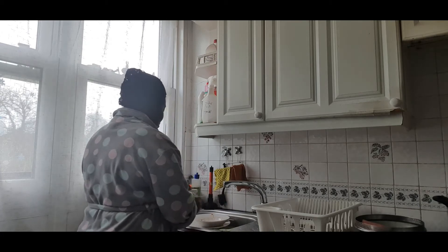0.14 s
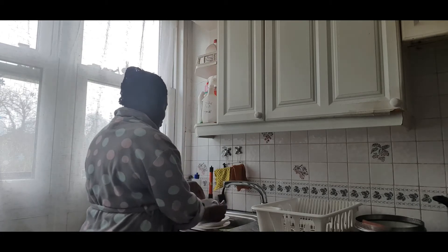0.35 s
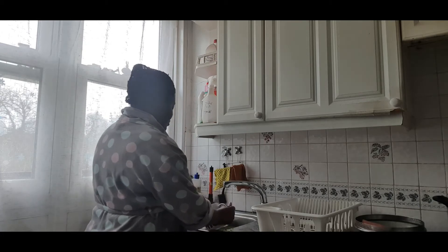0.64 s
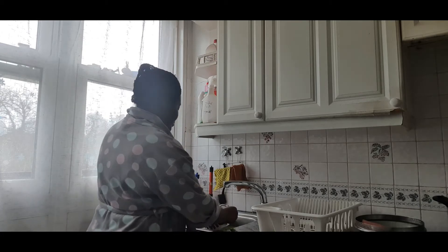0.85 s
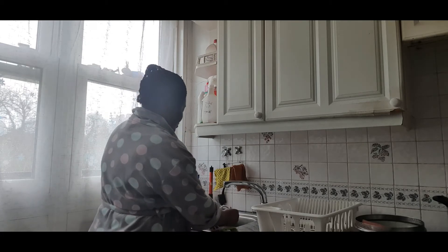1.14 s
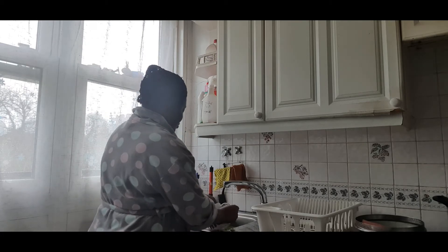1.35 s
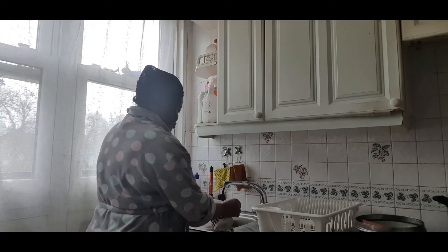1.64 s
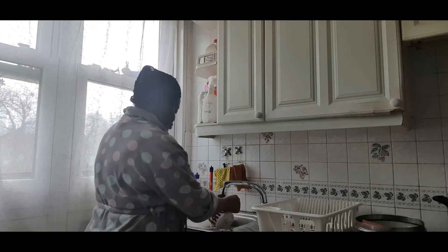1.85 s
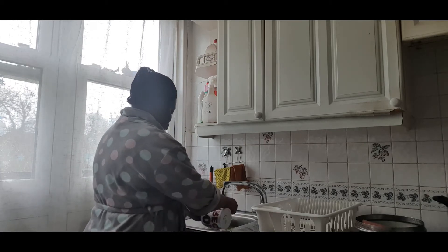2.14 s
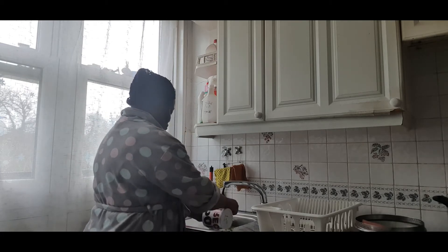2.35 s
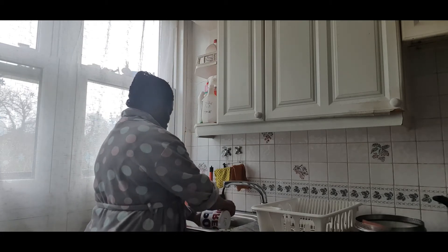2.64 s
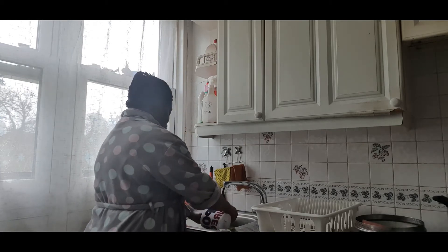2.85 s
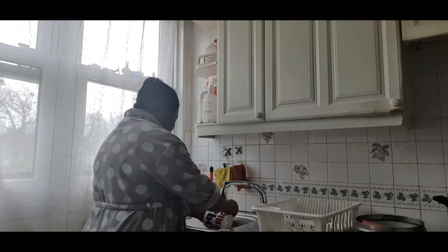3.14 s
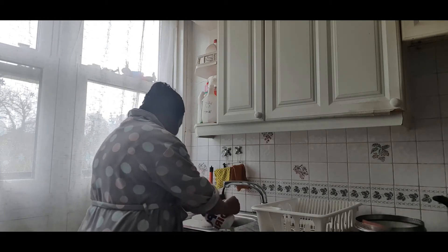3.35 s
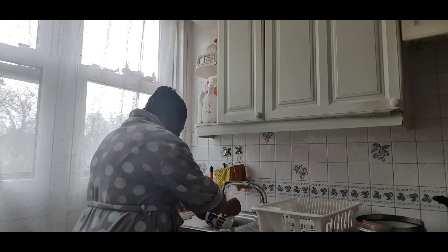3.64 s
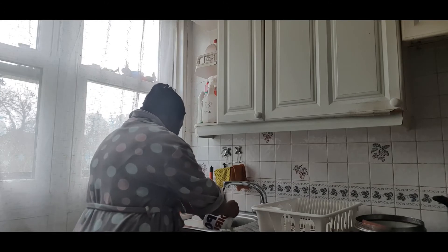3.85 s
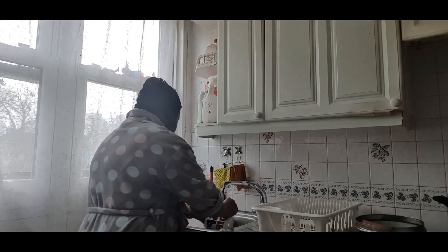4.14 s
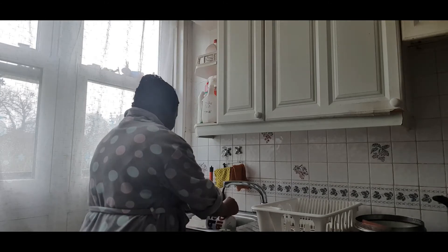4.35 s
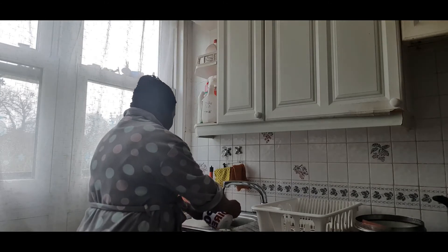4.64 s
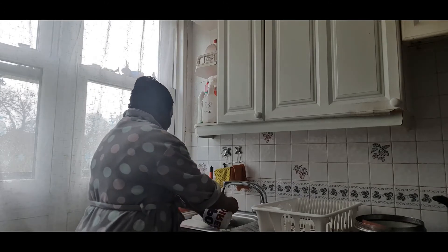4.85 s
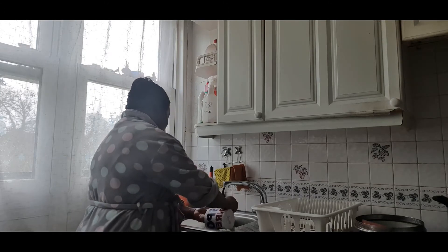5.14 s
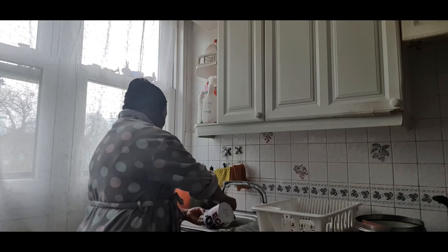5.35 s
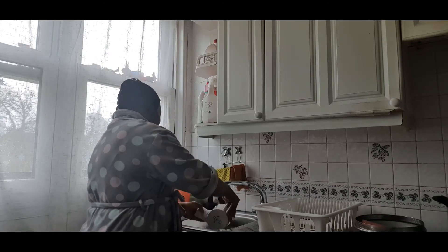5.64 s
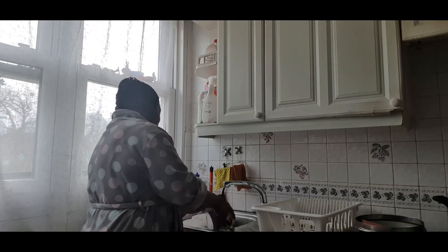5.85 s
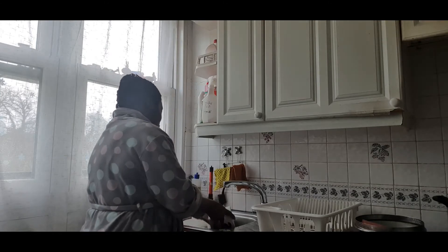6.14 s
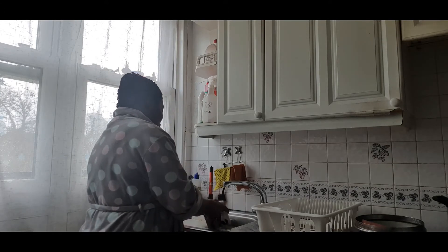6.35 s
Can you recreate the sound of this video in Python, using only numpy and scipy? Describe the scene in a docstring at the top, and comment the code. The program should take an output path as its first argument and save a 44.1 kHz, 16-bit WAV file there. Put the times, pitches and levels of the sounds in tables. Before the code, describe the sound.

A plate clinks and scrapes in a kitchen sink, a dish rocks to rest, wet sponge and drips follow, then a mug knocks down.

```python
"""Crockery clinks and scrapes at a kitchen sink: a plate, a dish rocking to rest, a mug set down at the end.
A wet sponge crackles, water drips and the drain gurgles, over a low background murmur and hiss.
The place is a small tiled kitchen, heard by two microphones from a few steps away.
Blows sound noise bursts and ringing modes of basin and crockery; random clicks drive scrapes, foam and
drain through such responses; drips are short tones of rising pitch."""
import sys
import numpy as np
from scipy import signal
from scipy.fft import rfft, irfft, next_fast_len
from scipy.io import wavfile

SR = 44100
rng = np.random.default_rng(int(sys.argv[2]) if len(sys.argv) > 2 else 0)


def store_wav(level_fs):
    """Save 16-bit WAV to argv[1]."""
    pcm = np.round(np.clip(np.atleast_2d(level_fs), -1, 1) * 32767)
    wavfile.write(sys.argv[1], SR, pcm.T.astype(np.int16))


N = 286643
TIME = np.arange(N) / SR
TAIL = TIME[:SR * 3 // 4]   # time axis of one blow or response, 0.75 s

# All levels in the tables are relative: the sources below add their own mix gains.
# Blows of each piece on the basin: (time [s], force [dB], hardness of the contact [dB])
PLATE_HITS = [(0.912, -24.5, 0), (0.923, -25, 3.5), (1.013, -44.5, 6), (1.345, -39, -5)]
DISH_ROCKS = [(1.523, -20.5, -4), (1.647, -24, -5), (1.767, -26.5, -3.5), (1.856, -30, -2),
              (1.936, -27.5, -4), (2.001, -27.5, -8), (2.031, -11, -15)]
MUG_HITS = [(5.571, -14.5, -4), (5.576, -6.5, -9.5)]
# Crockery held in the hand bumps the basin: (time [s], force [dB], hardness [dB], boom [dB])
BUMPS = [(0.906, -26, 0, -8), (1.08, -42.5, 4, 3.5), (1.155, -32, -1, -18.5), (1.315, -33.5, -12, -18),
         (2.253, -20, -22, -8.5), (2.611, -31.5, 4, -1.5), (2.748, -25, -22, -3.5),
         (4.065, -26, -0.5, -7.5), (4.143, -20, -8.5, -0.5), (5.061, -9.5, -9, -7),
         (5.19, -25.5, -13.5, -6.5), (5.244, -29.5, -6.5, -8)]
# Plate edge sliding: (start [s], length [s], grinding [dB], singing [dB])
SCRAPES = [(0.925, 0.075, -50, -43.5), (1.22, 0.13, -40.5, -60), (1.337, 0.18, -31.5, -45)]
# Crockery dragged over the basin floor: (start [s], length [s], boom [dB], rub [dB])
DRAGS = [(2.49, 0.29, -23.5, -30.5), (2.735, 0.13, -22, -29.5), (4.17, 0.131, -20, -34),
         (5.13, 0.19, -30.5, -27)]
# Squeezes of the wet sponge: (start [s], length [s], level [dB])
SQUEEZES = [(2.12, 0.32, -47.5), (2.34, 0.52, -43.5), (2.68, 0.67, -54), (3.22, 0.61, -60),
            (4.17, 0.62, -59.5), (4.65, 0.96, -65.5), (5.15, 0.53, -63.5)]
# The loudest drips and squelches: (time [s], level [dB], starting pitch [Hz])
DRIPS = [(2.279, -35, 4400), (2.401, -40.5, 2740), (2.497, -32.5, 2120), (2.816, -33.5, 1965),
         (2.947, -47, 3500), (3.062, -44, 1750), (3.289, -43.5, 4140), (3.336, -42.5, 2060),
         (3.499, -39, 1750), (3.755, -41, 2940), (4.318, -37, 1810), (4.46, -45.5, 4300),
         (4.589, -47, 1980), (5.361, -44.5, 1775), (5.952, -45.5, 3670)]
# Air gulped by the waste pipe: (time [s], level [dB], starting pitch [Hz])
GLUGS = [(3.312, -40, 779), (3.755, -46, 626), (3.894, -52.5, 566), (4.614, -47.5, 483)]
# Water trickling in the drain: (start [s], length [s], level [dB])
GURGLES = [(2.91, 0.123, -51.5), (3.05, 0.66, -62), (3.72, 0.69, -59.5), (4.85, 0.25, -62)]
# Level of the low background: (time [s], level [dB]), lower for a moment after the last blow
MURMUR = [(0, -56.5), (3.4, -53.5), (5.9, -53.5), (6.1, -60), (6.5, -56.5)]

# Ringing modes of basin, free crockery, a hand-damped piece and the sliding plate:
# (frequency [Hz], level [dB], 60 dB decay [s])
BASIN_BOOM = [(66, -13, 0.12), (118.2, 0.5, 0.12), (144.5, 1.5, 0.25), (198.7, -6.5, 0.34)]
BASIN_WALLS = [(295, -10, 0.34), (402, -13.5, 0.28), (477.4, 4.5, 0.29), (573, -10.5, 0.37),
               (578, 5.5, 0.098), (647, -13, 0.12), (735, -5, 0.3), (905, -4, 0.073), (1003, -8.5, 0.39)]
PLATE_MODES = [(750, -8, .2), (876, -9, .18), (1963, 1, .21), (2105, -7, .16), (2200, -8, .15),
               (2929, -15, .28), (3822, -16, .25), (5090, -17, .24), (5760, -20, .2), (6420, -17, .22),
               (9060, -20, .2), (9900, -21, .22), (11050, -16, .21), (12520, -23, .22), (13900, -23, .22)]
DISH_MODES = [(275, -2, .28), (586, 0, .32), (733, 0, .34), (1122, -13, .33), (1391, -13, .36),
              (1516, -12, .36), (1640, -9, .4), (2326, -16, .33), (3354, -13, .26), (3957, -12, .22)]
MUG_MODES = [(1395, -4, .42), (1890, -6, .2), (2035, -4, .17), (2546, -8, .2), (2965, -5, .22),
             (3380, -3, .2), (3620, -1, .18), (3984, -5, .22), (5908, -3, .22)]
HELD_MODES = [(769, 2.5, 0.097), (1089, -4.5, 0.081), (1898, 0, .11), (2850, -8, 0.22), (3990, -10.5, 0.1),
              (5010, -16, .15)]
SINGING_MODES = [(2010, 10, 0.14), (2090, 3.5, 0.27), (3490, -8.5, 0.33), (5090, 2.5, 0.35),
                 (6490, 0, 0.11), (9840, -6, 0.2), (12500, -9.5, 0.22), (14000, -15.5, .2)]

# Noise spectra of a knock, from its low thud to its bright tick: (frequency [Hz], density [dB per Hz])
THUD = [(25, -27), (60, -4), (140, -10), (250, -8.5), (400, -20.5)]
BODY = [(170, -36), (280, 1), (420, -3), (600, 3), (760, -3.5), (1050, -13), (1400, -16), (2200, -33.5)]
CLACK = [(700, 4), (1200, -2), (1900, 3.5), (2450, -1), (3600, 0.5), (4500, -6.5), (6300, -12.5),
         (8000, -28)]
TICK = [(5000, -16), (7000, 10.5), (9000, 7), (10500, 2.5), (12500, -9.5), (14500, -25)]
# Noise spectra of the plate's foot grinding, its grit, and the foam: (frequency [Hz], density [dB per Hz])
GRIND = [(90, 8), (250, -9.5), (380, 0), (500, -10), (760, 5.5), (890, -7), (1150, -17), (1700, -14.5)]
GRIT = [(900, 8), (1700, 7), (2100, 7.5), (2600, -3), (4600, -5.5), (5100, 8), (5600, -4), (6500, -2),
        (7500, -12), (9500, -2.5), (12500, -11), (14500, -21)]
FOAM = [(900, -6), (1500, -13.5), (2270, 1.5), (2750, -6.5), (3550, -0.5), (4300, -6), (6000, -8),
        (8500, -10), (12000, -21.5), (14500, -25.5)]
# Noise spectra of the background: (frequency [Hz], density [dB per Hz])
ROOM_TONE = [(15, -63), (25, -33), (48, -9), (102, -1), (125, -16.5), (157, -2), (179, -22), (216, -6.5),
             (275, -27), (314, -17), (351, -27), (571, -30), (702, -22), (1280, -33), (2200, -48),
             (2860, -75), (4840, -120)]
HISS = [(1500, -17.5), (2300, -7), (3000, -3), (3700, 1), (4700, -12), (5900, -6.5), (7300, -12),
        (8400, -9.5), (10500, -27.5), (14000, -32.5)]

# Likeness of the two channels, limited to 1 in use: (frequency [Hz], correlation)
LIKENESS = [(100, 1.25), (250, 0.65), (500, 0.96), (1000, 0.06), (2000, 0.02), (12000, 0)]
# Balance of the two microphones: (frequency [Hz], left minus right [dB])
BALANCE = [(60, 2.3), (190, 1.5), (320, -2), (700, 1.4), (1300, 1), (2600, 6.5), (5500, 7.5), (7500, 2.5),
           (9500, -4), (13000, -9.5)]

# How each piece sounds: boom against the force, tick and ring against the clack [dB], basin swell [s]
PLATE_TOUCH = dict(boom_db=-6.5, tick_db=-24.5, ring_db=0.5, swell=0.007)
DISH_TOUCH = dict(boom_db=-5.5, tick_db=-20, ring_db=0.56, swell=0.011)
MUG_TOUCH = dict(boom_db=-9, tick_db=-23, ring_db=-8, swell=0.004)
BUMP_TICK_DB, BUMP_SWELL_S, HELD_RING_DB = -27, 0.0085, -5.5

# Attack and release of a stroke, as shares of its length
SCRAPE_ATTACK, SCRAPE_RELEASE = 0.059, 0.22
DRAG_ATTACK, DRAG_RELEASE = 0.47, 0.45
SQUEEZE_ATTACK, SQUEEZE_RELEASE = 0.13, 0.63
GURGLE_ATTACK, GURGLE_RELEASE = 0.2, 0.2

# The higher a drip is pitched, the more spray comes with it; SPLASH_DB holds at SPLASH_HZ
SPLASH_DB, SPLASH_DB_PER_OCTAVE, SPLASH_HZ = -15, 10.5, 3000
HISS_DB = -66
KITCHEN_T60_S = 0.27
CUTOFF_HZ = 14600


def crockery():
    """Each blow sounds the basin and the piece itself, whose modes are damped when a hand holds it."""
    out = np.zeros((2, N))
    pieces = [
        (PLATE_HITS, PLATE_MODES, PLATE_TOUCH),
        (DISH_ROCKS, DISH_MODES, DISH_TOUCH),
        (MUG_HITS, MUG_MODES, MUG_TOUCH),
    ]
    for hits, modes, touch in pieces:
        for s, force_db, hardness_db in hits:
            add(out, s, blow(force_db, hardness_db, modes, **touch))
    for s, force_db, hardness_db, boom_db in BUMPS:
        clack_db = force_db + hardness_db
        tick_db = force_db + hardness_db / 2 + BUMP_TICK_DB
        basin = knock(force_db, force_db + boom_db, clack_db, tick_db, BUMP_SWELL_S)
        held = from_db(clack_db + HELD_RING_DB) * ringing(HELD_MODES, BUMP_SWELL_S)
        add(out, s, basin + held)
    return out


def blow(force_db, hardness_db, modes, boom_db, tick_db, ring_db, swell):
    """Force drives the basin; a harder contact adds clack and tick, and rings the piece more."""
    clack_db = force_db + hardness_db
    basin = knock(force_db, force_db + boom_db, clack_db, clack_db + tick_db, swell)
    return basin + from_db(clack_db + ring_db) * ringing(modes, swell=0.012)


def knock(body_db, thud_db, clack_db, tick_db, swell):
    """The hard contact gives a bright clack; the basin's walls and its boom swell behind it."""
    thud = from_db(0.5) * ringing(BASIN_BOOM, swell * 1.4)
    thud = thud + from_db(-6.5) * burst(THUD, swell, t60=0.46)
    body = from_db(-9.5) * ringing(BASIN_WALLS, swell)
    body = body + from_db(-6.5) * burst(BODY, swell, t60=0.26)
    clack = from_db(-4.5) * burst(CLACK, swell=0.0057, t60=0.29)
    clack = clack + from_db(-6.5) * burst(CLACK, swell=0.0039, t60=0.023)
    tick = from_db(2.2) * burst(TICK, swell=0.006, t60=0.28)
    low = from_db(thud_db) * thud + from_db(body_db) * body
    return low + from_db(clack_db) * clack + from_db(tick_db) * tick


def scrape():
    """The plate's unglazed foot catches and slips; as it slides, it sings with a few ringing modes."""
    grinding, singing = strokes(SCRAPES, SCRAPE_ATTACK, SCRAPE_RELEASE)
    slips = grains(per_s=2400, spread_db=3.5) * uneven(per_s=76, spread_db=3.5)
    low = through(slips * grinding, burst(GRIND, swell=0.0039, t60=0.16))
    grit = through(slips * singing, burst(GRIT, swell=0.00072, t60=0.16))
    song = through(slips * singing, ringing(SINGING_MODES, swell=0.002))
    return from_db(-3) * low + from_db(4) * grit + from_db(6.5) * song


def drags():
    """Wet crockery judders over the basin floor and drives its low modes."""
    booming, rubbing = strokes(DRAGS, DRAG_ATTACK, DRAG_RELEASE)
    slips = judder(hz=141.3, jitter=0.13)
    damped = [(hz, db, t60 * 0.12) for hz, db, t60 in BASIN_BOOM]
    boom = through(slips * booming, ringing(damped, swell=0.002))
    walls = through(slips * rubbing, ringing(BASIN_WALLS, swell=0.0021))
    rub = through(slips * rubbing, burst(BODY, swell=0.00053, t60=0.21))
    return from_db(-8.5) * boom + from_db(-12) * walls + from_db(-4.5) * rub


def judder(hz, jitter):
    """Wet skin and glaze grip and let go almost regularly."""
    gaps = np.exp(jitter * rng.standard_normal(2000)) / hz
    at = (np.cumsum(gaps) * SR).astype(int)
    sizes = rng.uniform(0.23, 1, len(at))
    inside = at < N
    return rms_one(np.bincount(at[inside], sizes[inside], N))


def sponge():
    """Foam crackles as the sponge is squeezed, and flares up with each splash."""
    splashes = np.zeros(N)
    for s, db, hz in DRIPS:
        splash_db = db + SPLASH_DB + SPLASH_DB_PER_OCTAVE * np.log2(hz / SPLASH_HZ)
        add(splashes, s, from_db(splash_db) * envelope(swell=0.03, t60=0.098))
    crackle = grains(per_s=380, spread_db=5) * squeeze() * uneven(per_s=28, spread_db=3)
    spray = from_db(1.5) * grains(per_s=870, spread_db=5.5) * splashes
    return through(crackle + spray, burst(FOAM, swell=0.00083, t60=0.19))


def squeeze():
    """How hard the sponge is worked, as a gain in time."""
    return strokes(SQUEEZES, SQUEEZE_ATTACK, SQUEEZE_RELEASE)[0]


def drips():
    """Drops and squelches patter in the basin and the waste pipe gulps, direct and through the room."""
    small = bubbles(DRIPS, count=5, spread=0.2, cycles=30, rise=0.25)
    fine = bubbles(trickle(count=330), count=1, spread=0, cycles=30, rise=0.2)
    large = bubbles(GLUGS, count=2, spread=0.11, cycles=69, rise=0.11)
    room = burst([(200, 0), (14000, 0)], swell=0.002, t60=KITCHEN_T60_S)
    water = from_db(17.5) * (small + fine) + from_db(25.5) * large
    return from_db(-5) * water + from_db(-2.5) * through(water, room)


def bubbles(rows, count, spread, cycles, rise):
    """Each event frees bubbles of like size, the first the loudest; their pitch climbs as they ring."""
    out = np.zeros(N)
    for s, db, hz in rows:
        for k in range(count):
            size, wait = rng.standard_normal(), rng.random()
            pitch = hz * np.exp(spread * size * min(k, 1))   # the first keeps the listed pitch
            life = TAIL[:SR // 10] * pitch / cycles   # reaches 1 when the bubble is 60 dB down
            climbing = pitch * (1 + rise * np.minimum(life, 1))
            plink = np.sin(2 * np.pi * np.cumsum(climbing) / SR) * from_db(-60 * life)
            add(out, s + k * wait * 0.0072, from_db(db - 1.36 * k) * plink / np.linalg.norm(plink))
    return out


def trickle(count):
    """Stray drops of many pitches, louder the harder the sponge is worked: (time [s], level [dB], pitch [Hz])."""
    when, size, pitch = rng.random((count, 3)).T
    s = when * TIME[-1]
    squeeze_db = 20 * np.log10(np.interp(s, TIME, squeeze()) + 1e-9)
    return np.column_stack([s, squeeze_db + 8 * size, 1200 * 3.5 ** pitch])


def drain():
    """Run-off gurgles in the hollow of the waste pipe."""
    hollow = burst([(450, -15.5), (540, -3), (600, -16.5), (720, -12.5)], swell=0.0019, t60=0.14)
    flow = strokes(GURGLES, GURGLE_ATTACK, GURGLE_RELEASE)[0]
    return through(grains(per_s=110, spread_db=-0.5) * flow, hollow)


def background():
    """A low murmur, with a level that moves in time, under a steady hiss."""
    murmur = gains(MURMUR)[0] * diffuse(ROOM_TONE, N)
    return murmur + from_db(HISS_DB) * diffuse(HISS, N)


def ringing(modes, swell):
    """Clear modes, newly weighted at each call; reflections make high ones shimmer, differently in each ear."""
    hz, db, t60 = np.transpose(modes)
    strength = from_db(db + rng.standard_normal(len(hz)))
    strength = strength / np.linalg.norm(strength) * np.sqrt(2)
    out = 0
    for f, g, t in zip(hz, strength, t60):
        # a phase offset between the ears gives the likeness at this pitch
        apart = np.arccos(np.clip(at_hz(LIKENESS, f), -1, 1)) * rng.choice([-1, 1]) / 2
        direct = np.sin(2 * np.pi * (f * TAIL + rng.random()) + [[apart], [-apart]])
        wander = np.cumsum(rng.standard_normal((2, len(TAIL))), axis=1) * np.sqrt(0.09 * f / SR)
        reflected = np.sin(2 * np.pi * (f * TAIL + rng.random((2, 1))) + wander)
        share = np.clip((f - 1200) / 5000, 0, 0.65)   # more reflected sound at high pitch
        mixed = np.sqrt(1 - share) * direct + np.sqrt(share) * reflected
        out = out + g * mixed * envelope(swell, t)
    return out


def burst(spectrum, swell, t60):
    """Countless close modes of basin and room, struck together, as decaying noise."""
    return diffuse(spectrum, len(TAIL)) * envelope(swell, t60)


def envelope(swell, t60):
    """Reflections pile up for a moment, then die away; the peak is 1."""
    shape = (1 - np.exp(-TAIL / max(swell, 1e-4))) * from_db(-60 * TAIL / t60)
    return shape / shape.max()


def diffuse(spectrum, size):
    """Stereo noise of a given colour, alike in the bass and unrelated in the treble."""
    n = next_fast_len(size, real=True)
    hz = np.arange(n // 2 + 1) * SR / n
    above = 1 / (1 + (hz / spectrum[-1][0] / 1.1) ** 8)
    below = 1 / (1 + (spectrum[0][0] / 1.1 / (hz + 1)) ** 8)
    alike = np.clip(at_hz(LIKENESS, hz), -1, 1)
    mid, side = rfft(rng.standard_normal((2, n)))
    both = np.sqrt(1 + alike) * mid + np.sqrt(1 - alike) * side * [[1], [-1]]
    coloured = both * from_db(at_hz(spectrum, hz)) * above * below
    return rms_one(irfft(coloured, n)[:, :size])


def through(force, response):
    """Play a force through a stereo response of normalized energy."""
    unit_response = response / np.sqrt(np.sum(response ** 2) / 2)
    return signal.fftconvolve(force[None], unit_response, axes=1)[:, :N]


def grains(per_s, spread_db):
    """Random clicks of uneven size and either sign, at unit power."""
    sizes = from_db(spread_db * np.minimum(rng.exponential(1, N), 4)) * rng.choice([-1, 1], N)
    return rms_one(sizes * (rng.random(N) < per_s / SR))


def strokes(rows, attack, release):
    """One gain in time for each level column: every stroke swells, holds and lets go."""
    out = 0
    for s, length, *db in rows:
        done = (TIME - s) / length
        pressure = np.clip(np.minimum(done / attack, (1 - done) / release), 0, 1)
        out = out + from_db(db)[:, None] * np.sin(np.pi / 2 * pressure) ** 2
    return out


def uneven(per_s, spread_db):
    """A gain that wanders at random, as the pressure of a hand does."""
    steps = rng.standard_normal(size=600)
    return from_db(spread_db * np.interp(TIME * per_s, np.arange(len(steps)), steps))


def gains(rows):
    """Level columns as gains in time, silent outside their span."""
    s, *columns = np.transpose(rows)
    return [from_db(np.interp(TIME, s, c, left=-200, right=-200)) for c in columns]


def from_db(db):
    """Decibels to gain."""
    return 10 ** (np.asarray(db) / 20)


def rms_one(x):
    """Scale to unit power."""
    return x / np.sqrt(np.mean(x ** 2) + 1e-20)


def at_hz(points, hz):
    """Read a spectrum on a log-frequency axis."""
    f, value = np.transpose(points)
    return np.interp(np.log(hz + 1), np.log(f), value)


def add(out, s, sound):
    """Mix a sound in at time s."""
    i = round(s * SR)
    out[..., i:i + sound.shape[-1]] += sound[..., :N - i]


def scene():
    """The work at the sink over the low background."""
    return crockery() + scrape() + drags() + sponge() + drips() + drain() + background()


def record(dry):
    """The two microphones differ in colour and share a dip in the treble; deep bass and the top are cut."""
    n = next_fast_len(N + len(TAIL), real=True)
    hz = np.arange(n // 2 + 1) * SR / n
    # (frequency [Hz], level [dB])
    response = [(20, -11), (50, -2), (500, -1.0), (2000, -2.5), (6700, -1.5), (7500, -5.5), (8700, -3.0)]
    colour = at_hz(response, hz)
    sides = at_hz(BALANCE, hz) * np.array([[1], [-1]]) / 2
    heard = irfft(rfft(dry, n) * from_db(colour + sides), n)[:, :N]
    top_cut = signal.ellip(10, 0.2, 80, CUTOFF_HZ, fs=SR, output="sos")
    return signal.sosfilt(top_cut, heard)


dry = scene()
out = record(dry)
store_wav(out)
```